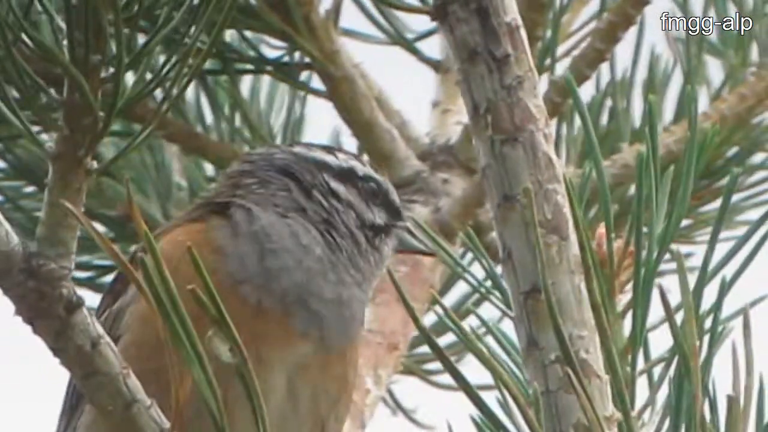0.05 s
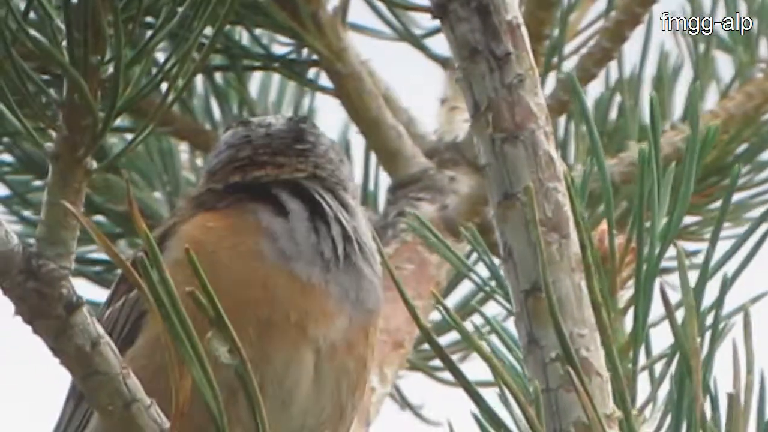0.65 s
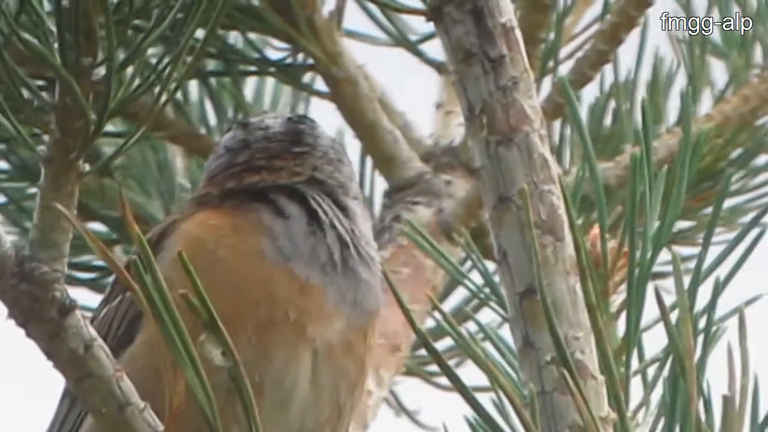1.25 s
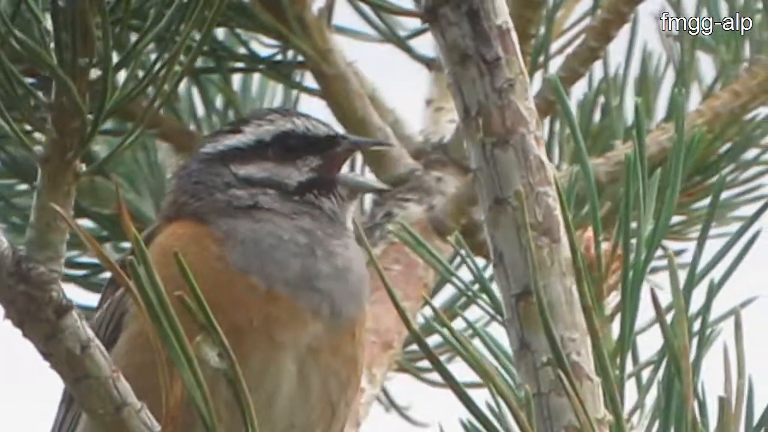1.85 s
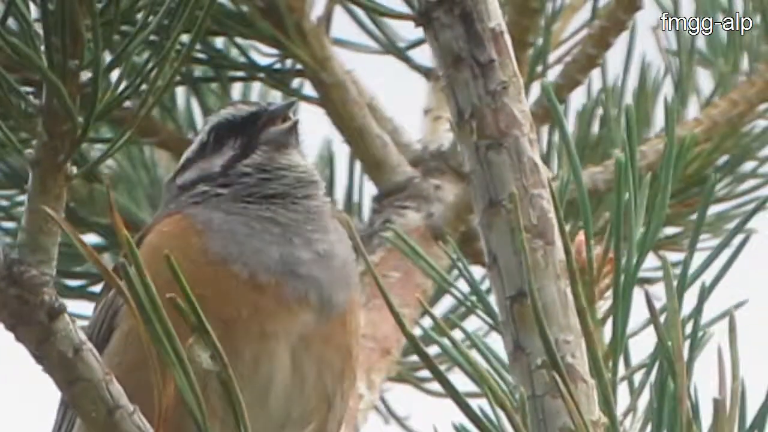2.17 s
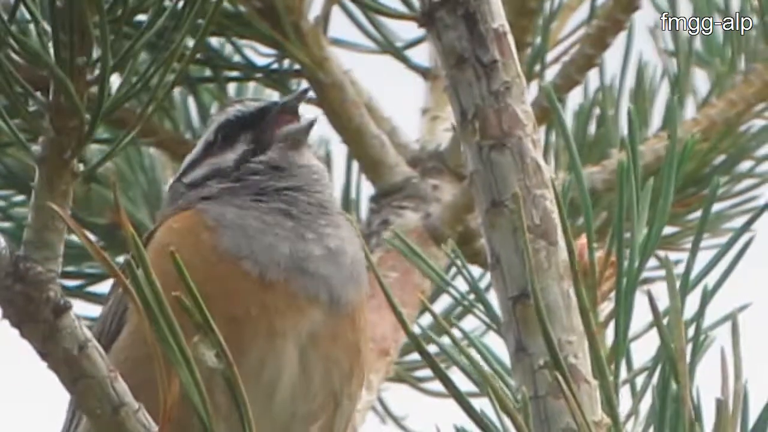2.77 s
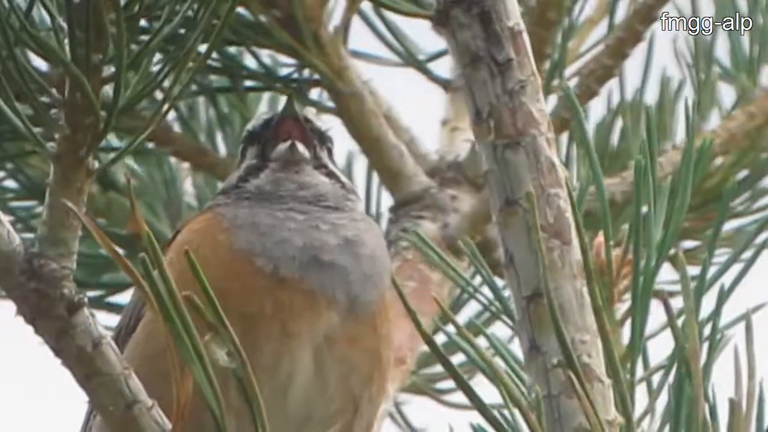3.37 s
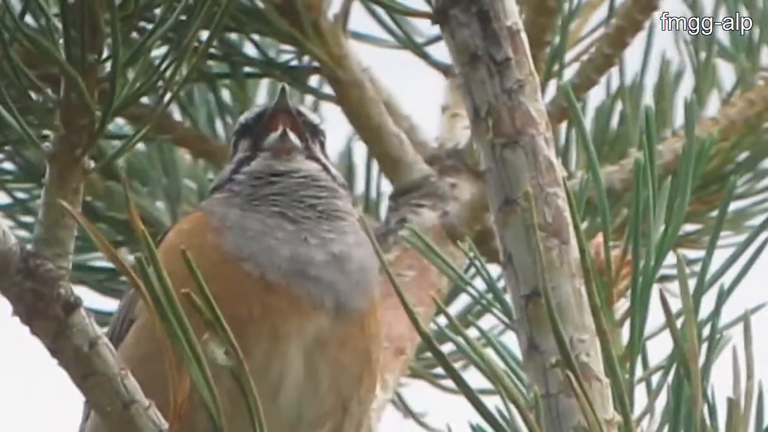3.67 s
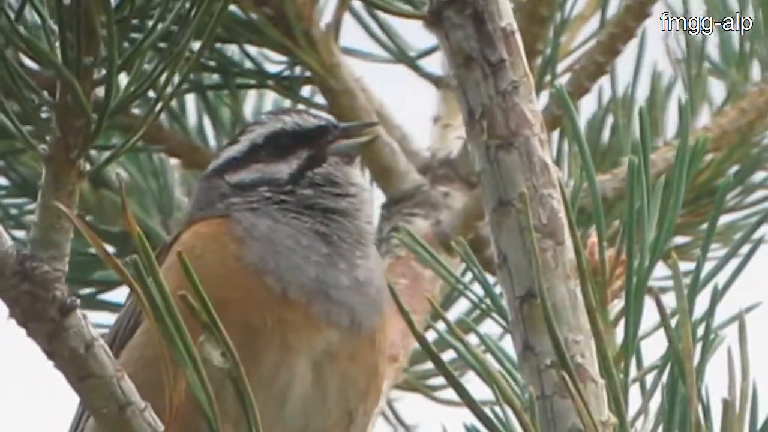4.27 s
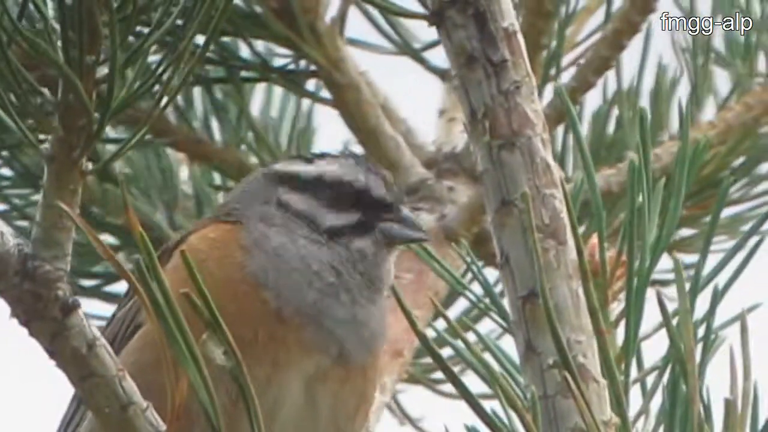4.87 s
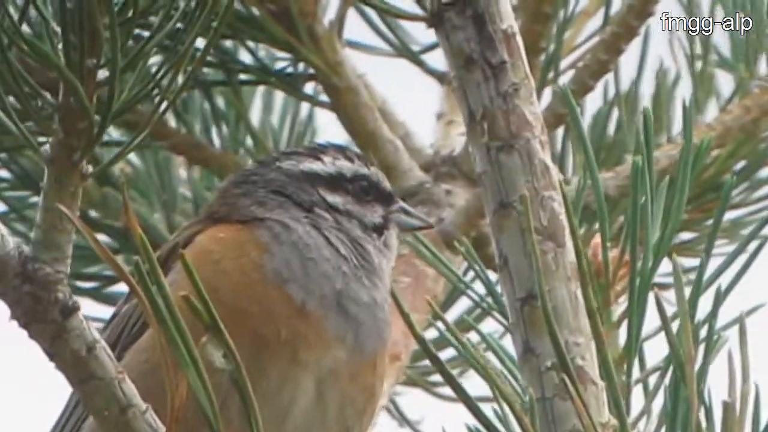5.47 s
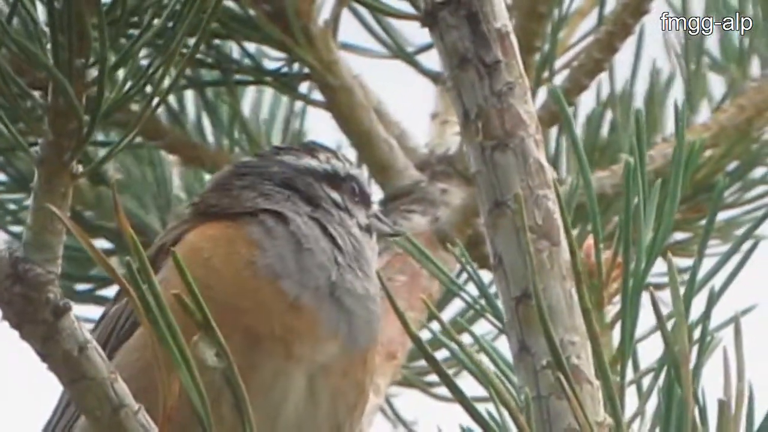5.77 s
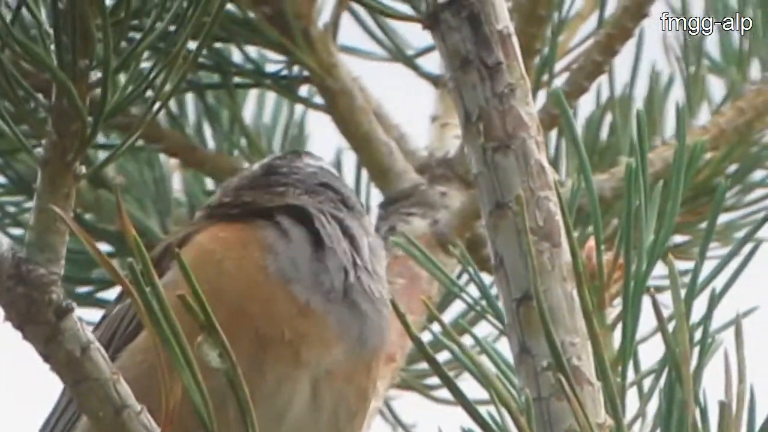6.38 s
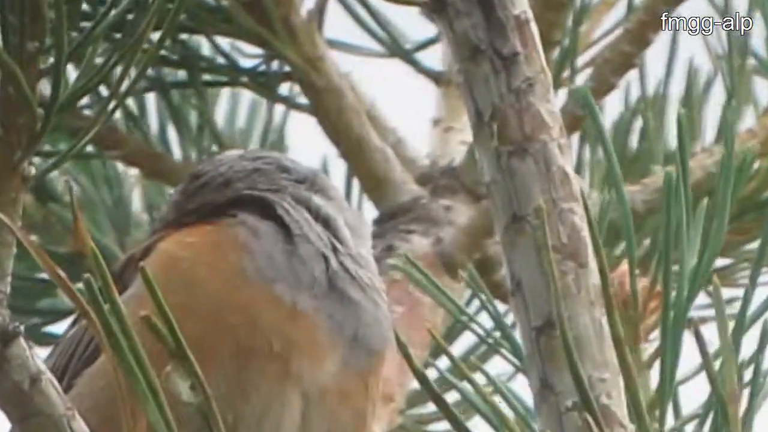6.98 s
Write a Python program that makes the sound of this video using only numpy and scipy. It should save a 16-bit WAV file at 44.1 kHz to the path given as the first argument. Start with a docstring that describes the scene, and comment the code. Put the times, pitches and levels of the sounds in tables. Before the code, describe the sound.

A soft, steady rush of wind in trees and the low, wavering hum of a distant engine run throughout the seven seconds. A light gust rumbles on the microphone around 1 second, among faint, thin, high bird whistles. From about 1.7 seconds a small songbird in a pine sings one quick, varied phrase: sharp peeps, a rising whistle, two louder high scooping notes around 2.5 seconds, then a rapid jumble of slides, twitters, tiny trills and a briefly held whistle near 3.7 seconds. Lower chirps and a rising note finish it just before 5 seconds. The notes echo lightly among the trees. Faint high peeps and soft raspy notes come from farther off, with tiny dry ticks near 2, 5.5 and 6 seconds. From about 6.2 to 6.8 seconds, fingers brush and knock the camera, making a close, scratchy rustle with small hollow bumps.

```python
"""Steady wind noise and the hum of a distant engine are heard first, with faint, thin whistles.
From a pine a bunting sings one quick, thin phrase: each side of its syrinx makes a gliding,
nearly pure tone, and the whistles scatter among the trees. A faint 7.4 kHz tone sounds along with
one held whistle, and there are a few dry ticks.
Near the end fingers brush and knock the camera, exciting the modes of its wall and hollow shell."""
import sys
import numpy as np
from scipy import signal
from scipy.fft import rfft, irfft, next_fast_len
from scipy.io import wavfile
from scipy.ndimage import map_coordinates

SR = 44100
rng = np.random.default_rng(int(sys.argv[2]) if len(sys.argv) > 2 else 0)


def int16_out(signal):
    """Quantize to a 16-bit WAV file."""
    q = np.round(np.clip(np.atleast_2d(signal).T, -1, 1) * 32767)
    wavfile.write(sys.argv[1], SR, q.astype(np.int16))


N = 310023
TIME = np.arange(N) / SR


def amp(db):
    """Amplitude ratio: a factor of ten for every 20 dB."""
    return 10 ** (np.asarray(db) / 20)


def unit(x):
    """Normalisation to an rms of 1."""
    return x / np.sqrt(np.mean(x ** 2) + 1e-20)


def along(points, hz):
    """Interpolation of (frequency [Hz], value) points on a logarithmic frequency axis."""
    f, v = np.transpose(points)
    return np.interp(np.log(hz + 1), np.log(f + 1), v)


def curve(rows):
    """Linear interpolation of (time [s], value) rows at every sample."""
    return np.interp(TIME, *np.transpose(rows))


def wobble(rate):
    """Smooth random modulation: a spline through `rate` Gaussian knots a second."""
    return map_coordinates(rng.standard_normal(int(N * rate / SR) + 4), [TIME * rate])


def filtered(x, response):
    """Linear filtering: the spectrum of x times a complex frequency response."""
    size = next_fast_len(N + SR // 2)
    return irfft(rfft(x, size) * response(np.fft.rfftfreq(size, 1 / SR)), size)[..., :N]


def resonances(modes, hz):
    """Superposition of damped modes (frequency [Hz], bandwidth [Hz], gain [dB]) of alternating sign."""
    return sum((-1) ** k * amp(db) * 1j * hz * width / (centre ** 2 - hz ** 2 + 1j * hz * width)
               for k, (centre, width, db) in enumerate(modes))


def noise(response):
    """Partly coherent stereo noise of rms 1: independent mid and side signals share the power."""
    # likeness of left and right: (frequency [Hz], correlation [ratio])
    coherence = [(150, 0.4), (600, 0.024), (1400, 0.47), (3000, 0.018)]

    def mid_side_response(hz):
        angle = np.arccos(np.clip(along(coherence, hz), -1, 1)) / 2
        return response(hz) * np.array([np.cos(angle), np.sin(angle)])

    mid, side = filtered(rng.standard_normal((2, N)), mid_side_response)
    return unit(np.array([mid + side, mid - side]))


def glide(s, hz, t):
    """Cubic interpolation of pitch through the points (s, hz), level at each turning point."""
    step = np.maximum(np.diff(s), 1e-4)
    slope = np.diff(hz) / step
    before, after = slope[:-1], slope[1:]
    inner = (before * abs(after) + after * abs(before)) / (abs(before) + abs(after) + 1)
    tangent = np.r_[slope[0], inner, slope[-1]]
    k = np.clip(np.searchsorted(s, t) - 1, 0, len(step) - 1)
    u = np.clip((t - s[k]) / step[k], 0, 1)
    bend = (1 - u) * (tangent[k] - slope[k]) - u * (tangent[k + 1] - slope[k])
    return hz[k] + step[k] * u * (slope[k] + (1 - u) * bend)


def swell(u, peak, fade_db, roundness):
    """Envelope in dB over a note (u from 0 to 1): 0 at its peak, fade_db lower at both ends."""
    return -fade_db * np.interp(u, [0, np.clip(peak, .01, .99), 1], [1, 0, 1]) ** roundness


def whistles(notes, edge_s, jitter, flutter_db):
    """Slightly unsteady sinusoidal oscillation along paths of (time [s], pitch [Hz], level [dB])."""
    # the weak octave that the beak lets through: (time [s], level re fundamental [dB])
    beak = [(2.35, -50.5), (3.2, -40), (3.72, -32.5), (4.4, -34.5), (4.69, -8), (4.76, -24), (4.85, -24),
            (4.88, -42)]
    out = np.zeros(N)
    waver = 1 + jitter * wobble(350)
    effort_db = flutter_db * wobble(220)
    for note in notes:
        s, hz, db = np.transpose(note)
        i = np.arange(int((s[0] - edge_s / 2) * SR), int((s[-1] + edge_s / 2) * SR))
        t = TIME[i]
        pitch = glide(s, hz, t) * waver[i]
        phase = 2 * np.pi * np.cumsum(pitch) / SR
        gate = np.sin(np.pi / 2 * np.clip(np.minimum(t - t[0], t[-1] - t) / edge_s, 0, 1)) ** 2
        tone = np.sin(phase) + amp(np.interp(t, *np.transpose(beak))) * np.sin(2 * phase)
        out[i] += np.sqrt(2) * gate * amp(np.interp(t, s, db) + effort_db[i]) * tone
    return out


def scatter(x, t60, build_s):
    """Diffuse echoes off needles and trunks build up, then decay exponentially, different at each ear."""
    t = np.arange(SR) / SR
    tail = rng.standard_normal((2, SR)) * amp(-60 * t / t60) * (1 - np.exp(-(t / build_s) ** 2))
    return signal.fftconvolve(x[None], tail / np.linalg.norm(tail[0]), axes=1)[:, :N]


def wind():
    """Turbulence makes an even rush in the trees, with two faint resonances, and buffets the microphone."""
    # spectrum of the rush: (frequency [Hz], relative density [dB])
    air = [(150, -13), (270, -17.5), (760, -23.5), (1450, -27), (1900, -29.5), (3000, -29.5), (6500, -38.5),
           (9800, -49)]
    # wind on the microphone ports: (time [s], level [dB])
    gusts = [(0.3, -70), (0.4, -57), (0.73, -48.5), (0.98, -55), (1.15, -41.5), (1.7, -59.5), (2.4, -68),
             (5.3, -77.5), (6.3, -51.5), (7, -61)]
    rush = amp(-50 + 0.28 * wobble(2.93)) * noise(lambda hz: amp(along(air, hz)))
    hollow = amp(-63) * noise(lambda hz: resonances([(1110, 57, 0.0081), (1433, 37, 0.01)], hz))
    gust_gain = amp(curve(gusts) + 5 * wobble(4.6))
    rumble = noise(lambda hz: amp(along([(100, -1), (400, -39.5)], hz)) * (hz < 400))
    return (rush + hollow + gust_gain * rumble) * amp([[-.8], [.8]])


def engine():
    """A periodic exhaust hum whose fundamental fades in and out with the air; its octave is steadier."""
    # fading of the fundamental: (time [s], level [dB])
    fading = [(0.0, -41), (0.15, -54), (0.31, -46), (1.51, -40), (2.6, -59.5), (3.23, -43.5), (3.93, -38),
              (4.34, -47), (4.52, -41), (5.31, -52), (5.68, -40), (6.15, -53), (6.65, -52.5), (6.95, -44.5)]
    pitch_hz = 71.9 * (1 + 0.0018 * wobble(1.99))
    phase = 2 * np.pi * np.cumsum(pitch_hz) / SR
    octave_db = curve([(.5, -72.5), (3, -58.5), (7, -58)]) + 1.2 * wobble(0.8)
    hum = amp(curve(fading)) * np.sin(phase) + amp(octave_db) * np.sin(2 * phase)
    return np.sqrt(2) * hum * amp([[-.5], [.5]])


def faint_tones():
    """Scattering blurs faint, thin tones; the last carry a weak second voice."""
    # At 3.69 s a 7.4 kHz tone sounds along with the held whistle; the other rows are birds farther off.
    # (start [s], end [s], first pitch [Hz], last pitch [Hz], relative level [dB])
    tones = [(0.885, 0.915, 3700, 2870, -56.5), (1.52, 1.626, 6980, 7510, -59.5),
             (1.76, 1.877, 6760, 6674, -46.5), (2.096, 2.168, 6970, 6480, -47),
             (3.69, 3.82, 7380, 7350, -60), (4.225, 4.305, 7370, 7270, -55),
             (4.402, 4.547, 7280, 7200, -56.5), (5.15, 5.24, 7280, 7020, -66),
             (5.295, 5.422, 7060, 6820, -64.5), (5.52, 5.635, 6920, 6600, -64),
             (5.723, 5.769, 4440, 5680, -52.5), (6.132, 6.216, 7460, 6930, -54),
             (6.283, 6.358, 7260, 6900, -46), (6.427, 6.498, 7210, 6590, -46.5)]
    upper_hz, upper_db, upper_from_s = 9100, -18, 6
    upper = [(start, end, upper_hz, upper_hz, db + upper_db)
             for start, end, _, _, db in tones if start > upper_from_s]
    notes = [[(start, first, db - 6.5), ((start + end) / 2, (first + last) / 2, db), (end, last, db - 7)]
             for start, end, first, last, db in tones + upper]
    direct = whistles(notes, edge_s=0.011, jitter=0.008, flutter_db=2)
    return amp(-4) * (direct + scatter(direct, t60=0.069, build_s=0.0016))


def rasps():
    """Soft, scratchy bird notes: random amplitude modulation roughens bursts of noise in two bands."""
    # (start [s], length [s], level [dB])
    bursts = [(0.16, 0.05, -52), (1.145, 0.046, -54), (2.519, 0.044, -50), (4.112, 0.044, -47),
              (4.437, 0.05, -54), (5.948, 0.051, -48.5)]
    # resonances of the voice: (frequency [Hz], bandwidth [Hz], gain [dB])
    bands = [(2640, 450, -1), (6640, 740, -10.5)]
    gate = sum(amp(db) * np.exp(-(2 * (TIME - s) / length - 1) ** 4) for s, length, db in bursts)
    grain = unit(amp(3 * wobble(200)))
    return gate * grain * noise(lambda hz: resonances(bands, hz) * (hz > 1800))


def ticks():
    """Tiny dry snaps: heavily damped oscillations, each only a few cycles long."""
    # (time [s], initial level [dB])
    snaps = [(2.075, -36.5), (5.524, -29.5), (5.998, -32)]
    ring_hz, t60 = 2400, 0.0068
    out, t = np.zeros(N), TIME[:SR // 20]
    for s, db in snaps:
        out[round(s * SR):][:len(t)] += amp(db - 60 * t / t60) * np.sin(2 * np.pi * ring_hz * t)
    return out


def handling():
    """Friction and impacts of fingers excite the camera's surface and thin wall; its shell rings on."""
    # sliding fingers: (midpoint [s], length [s], surface drive [dB], shell drive [dB])
    rubs = [(6.219, 0.02, -53, -40), (6.26, 0.039, -45.5, -35), (6.455, 0.11, -51.5, -47),
            (6.543, 0.051, -39, -61), (6.597, 0.042, -41.5, -55), (6.703, 0.058, -46.5, -54)]
    # impacts: (time [s], surface drive [dB], shell drive [dB])
    knocks = [(6.199, -45, -29.5), (6.213, -47, -41), (6.483, -38, -56), (6.5127, -26, -47),
              (6.5141, -34, -42), (6.5415, -38, -56), (6.6606, -36.5, -36), (6.664, -38, -43),
              (6.754, -36, -52)]
    # spectrum of the contact noise: (frequency [Hz], relative density [dB])
    scrape = [(300, -23), (900, -5), (1450, -3.5), (1900, -4), (2700, 2.5), (3600, -5.5), (5000, -5),
              (9800, -30)]
    # modes of the thin wall and of the hollow shell: (frequency [Hz], bandwidth [Hz], gain [dB])
    wall_modes = [(2360, 130, -5.5), (2684, 140, 2.5), (2960, 120, 3)]
    shell_modes = [(298, 36, 0), (416, 53, -1), (490, 33, 0.5), (764, 73, -8.5), (1440, 206, -5),
                   (1820, 210, -9), (2800, 24, 0)]
    surface_drive, shell_drive = np.zeros((2, N))
    grip = unit(amp(3.3 * wobble(400)))  # skin sticks and slips
    for s, length, surface_db, shell_db in rubs:
        stroke = grip * np.exp(-(2 * (TIME - s) / length) ** 2)
        surface_drive += amp(surface_db) * stroke
        shell_drive += amp(shell_db) * stroke
    contact_t60 = 0.019
    blow = amp(-60 * TIME[:SR // 20] / contact_t60)
    for s, surface_db, shell_db in knocks:
        i = round(s * SR) + np.arange(len(blow))
        surface_drive[i] += amp(surface_db) * blow
        shell_drive[i] += amp(shell_db) * blow
    surface = surface_drive * noise(lambda hz: amp(along(scrape, hz)))
    wall = filtered(surface_drive * rng.standard_normal((2, N)), lambda hz: resonances(wall_modes, hz))
    shell = filtered(shell_drive * rng.standard_normal(N), lambda hz: resonances(shell_modes, hz))
    return surface + amp(9.5) * wall + amp(16) * shell * amp([[-1], [1]])


def risers():
    """Frequency and amplitude climb together in two low whistles, which then fade."""
    # one path a whistle: (time [s], pitch [Hz], relative level [dB])
    paths = [
        [(3.085, 2676, -56), (3.117, 2616, -38.5), (3.127, 2740, -32), (3.139, 2780, -32), (3.159, 3032, -30.5),
         (3.175, 3060, -28), (3.195, 3330, -37.5), (3.225, 3230, -55)],
        [(4.668, 2710, -54), (4.7, 2384, -57.5), (4.772, 2520, -45.5), (4.818, 2690, -46.5), (4.842, 2980, -42),
         (4.856, 3400, -60), (4.888, 3870, -46.5), (4.916, 4120, -56)],
    ]
    return [np.add(path, (0, 0, 3)) for path in paths]  # 3 dB of gain


def held_whistles():
    """Attack, sagging sustain and quick release shape a linear rise in pitch with slight vibrato."""
    # (start [s], length [s], first pitch [Hz], last pitch [Hz], attack [s], level [dB])
    holds = [(2.205, 0.205, 3510, 4816, 0.046, -35.5), (3.667, 0.14, 4620, 4740, 0.034, -34)]
    sag_db_per_s, release_s, fade_db = 40.5, 0.024, 28.5
    vibrato_hz, vibrato_share = 21, 0.0067
    notes = []
    for start, length, first, last, attack, db in holds:
        t = np.linspace(0, length, 60)
        fade = np.interp(t, [0, attack, length - release_s, length], [1, 0, 0, 1])
        level = db - sag_db_per_s * (t - attack) - fade_db * fade
        vibrato = 1 - vibrato_share * np.sin(2 * np.pi * vibrato_hz * t)
        notes.append(np.c_[start + t, (first + (last - first) * t / length) * vibrato, level])
    return notes


def warbles():
    """One modulation of uneven depth swings pitch and level about a glide that drops at the end."""
    # (start [s], length [s], first pitch [Hz], last pitch [Hz], rate [Hz], swing [ratio], level [dB])
    trills = [(1.329, 0.063, 6400, 6540, 23, .04, -46.5), (4.1403, 0.075, 6120, 6160, 78.5, 0.045, -40.5),
              (4.266, .036, 5850, 4470, 57, .07, -43.5)]
    u, notes = np.linspace(0, 1, 90), []
    depth = 1 + 0.22 * wobble(60)
    for start, length, first, last, rate, swing, db in trills:
        s = start + length * u
        modulation = np.sin(2 * np.pi * rate * length * u) * np.interp(s, TIME, depth)
        pitch = (first + (last - first) * u) * (1 + swing * modulation - .12 * u ** 20)
        level = db + 3 * modulation + swell(u, peak=0.63, fade_db=5.5, roundness=6.5)
        notes.append(np.c_[s, pitch, level])
    return notes


def slurs():
    """Single frequency sweeps link the syllables, each swelling once to a peak."""
    # (start [s], length [s], first pitch [Hz], pitch at peak [Hz], last pitch [Hz],
    #  place of peak [share of length], level [dB])
    sweeps = [(1.7, 0.054, 5400, 4430, 4640, 0.52, -50), (1.738, .014, 4630, 6370, 3900, 0.67, -47),
              (1.751, 0.013, 3700, 2810, 3530, .45, -43), (1.762, 0.031, 3930, 3430, 2710, 0.44, -43.5),
              (1.894, 0.027, 9050, 9370, 6850, 0.4, -44), (2.788, 0.0069, 2610, 3050, 3200, .5, -36),
              (2.797, .007, 2890, 3140, 3120, 0.5, -34.5), (2.909, 0.011, 2380, 3090, 3450, .6, -33),
              (2.985, 0.0062, 5340, 6600, 7300, 0.62, -40.5), (2.995, .03, 5350, 5640, 6070, 0.6, -34),
              (3.013, .01, 6470, 6700, 6900, .5, -39.5), (3.038, 0.023, 3820, 5240, 5230, .75, -42.5),
              (3.058, 0.014, 7380, 6270, 4750, 0.22, -33.5), (3.333, 0.011, 3435, 2965, 2560, 0.66, -29),
              (3.435, 0.027, 8920, 8890, 8300, 0.64, -39.5), (3.47, .022, 7790, 6940, 6380, .52, -25.5),
              (3.792, .011, 4740, 5480, 6700, 0.59, -41.5), (4.583, 0.027, 5530, 6540, 6970, 0.44, -40),
              (4.631, 0.0053, 4750, 6950, 7610, 0.44, -46), (4.636, 0.035, 7680, 6650, 5430, .25, -40.5)]
    u, notes = np.linspace(0, 1, 25), []
    for start, length, first, loudest, last, peak, db in sweeps:
        pitch = glide(length * np.array([0, peak, 1]), np.array([first, loudest, last]), length * u)
        level = db + swell(u, peak, fade_db=10, roundness=1.8)
        notes.append(np.c_[start + length * u, pitch, level])
    return notes


def syllables():
    """The two sides of the syrinx oscillate independently, in patterns repeated with small changes."""
    # one path for each side in use: (time from start [s], pitch [Hz], relative level [dB])
    peep = [
        [(0, 6220, -14), (.0105, 7300, -1), (.0195, 6560, -1.5), (.03, 5250, -31.5)],
    ]  # a quick arch
    scoop = [
        [(0, 5440, -25.5), (.004, 6900, -14), (.009, 8310, -36), (.018, 7060, -15), (.045, 6653, 2.5),
         (.061, 6880, -1.5), (.079, 7380, -12)],
        [(.003, 5420, -27), (.009, 7200, -10)],
    ]  # a double flick, then a loud hollow curve
    tumble = [
        [(0, 3940, -12.5), (.0065, 5510, -7), (.009, 5150, -10)],
        [(.01, 4220, -12), (.0165, 5630, -8.5), (.022, 4950, -15), (.0365, 3945, 1), (.053, 3450, -12)],
    ]  # two hops and a slide
    zigzag = [
        [(0, 4400, -7), (.0075, 2730, -11), (.015, 3784, -1), (.024, 3970, 2.5), (.0295, 4600, -8),
         (.035, 3710, -3), (.044, 2900, -17)],
    ]  # down, up with a kink, down
    twitter = [
        [(0, 2955, -10), (.01, 3660, -12), (.015, 6200, -0.5), (.0195, 7130, -12), (.0275, 5780, -5.5),
         (.036, 5030, -5.5)],
        [(.012, 2650, -2), (.0255, 4640, -2.6), (.0325, 3720, -1.8)],
    ]  # two arches, one over the other
    lilt = [
        [(0, 6800, -19), (.012, 7260, -17), (.026, 6680, 0), (.033, 7230, -6.5)],
    ]  # a soft rise, then a stressed dip
    chirp = [
        [(0, 2550, -9.5), (.008, 2884, 0.5), (.018, 3245, -4.5), (.027, 2530, -5)],
        [(-.013, 3050, -18), (.007, 3900, -16)],
    ]  # a leaning arch under an upstroke
    # repeats of each: (start [s], time stretch [ratio], transposition [semitones], gain [dB])
    peeps = [(1.972, 0.94, 0.011, -27), (2.077, 1, 0, -28.5)]
    scoops = [(2.455, 0.96, 0, -23), (2.604, 0.94, .55, -24)]
    tumbles = [(2.729, 0.97, 0.11, -33.5), (2.854, 0.94, -0.11, -33)]
    zigzags = [(3.296, .82, 0, -37), (3.907, 1, -0.14, -35), (4.03, 1.04, 0.14, -37.5)]
    twitters = [(3.526, 1.01, 0.078, -40), (3.591, .99, -0.12, -37.5)]
    lilts = [(3.867, .97, -0.34, -32), (3.989, 1.1, 0.44, -35)]
    chirps = [(4.298, 0.93, -.2, -36.5), (4.343, 0.89, 0, -33), (4.383, 0.96, 0.15, -36),
              (4.427, 0.88, 0.34, -37.5)]
    kinds = [(peep, peeps), (scoop, scoops), (tumble, tumbles), (zigzag, zigzags),
             (twitter, twitters), (lilt, lilts), (chirp, chirps)]
    return [np.multiply(path, (stretch, 2 ** (semitones / 12), 1)) + (start, 0, db)
            for paths, repeats in kinds for start, stretch, semitones, db in repeats for path in paths]


def bunting():
    """Direct song reaches the two microphone ports unequally; near branches and the wood reflect it."""
    # level difference between the ports: (frequency [Hz], left minus right [dB])
    balance = [(3900, 0), (4700, -10.5), (5600, 2), (6900, 2), (8600, -2.5)]
    # phase difference between the ports: (frequency [Hz], lead of left [rad])
    lead = [(3200, -0.5), (3900, -1.9), (4700, -3), (5600, 0.5)]
    # colour of the echoes: (frequency [Hz], gain [dB])
    needles = [(3000, -0.5), (4200, -2.5), (6500, 2)]
    notes = syllables() + slurs() + warbles() + held_whistles() + risers()
    song = whistles(notes, edge_s=.002, jitter=.0018, flutter_db=.9)
    half = np.array([[.5], [-.5]])  # each port takes half of the difference
    direct = filtered(song, lambda hz: amp(along(balance, hz) * half) * np.exp(1j * along(lead, hz) * half))
    reflected = filtered(song, lambda hz: amp(along(needles, hz)))
    branches = amp(-9.5) * scatter(reflected, t60=0.1, build_s=0.0041)
    wood = amp(-18.5) * scatter(reflected, t60=0.41, build_s=0.02)
    return direct + branches + wood


def scene():
    """Superposition of all sources; the microphone's response colours the noisy ones."""
    # a treble notch with a peak just above it: (frequency [Hz], gain [dB])
    microphone = [(7200, 0), (8000, -5), (8250, -23), (8650, -1), (8800, 12.5), (8920, 5), (9480, 4.5),
                  (9700, -17)]
    background = filtered(wind() + handling() + rasps(), lambda hz: amp(along(microphone, hz)))
    return bunting() + faint_tones() + engine() + ticks() + background


def record(dry):
    """Ideal low-pass filtering: the camera keeps nothing above its band limit."""
    return filtered(dry, lambda hz: hz < 9850)


dry = scene()
out = record(dry)
int16_out(out)
```